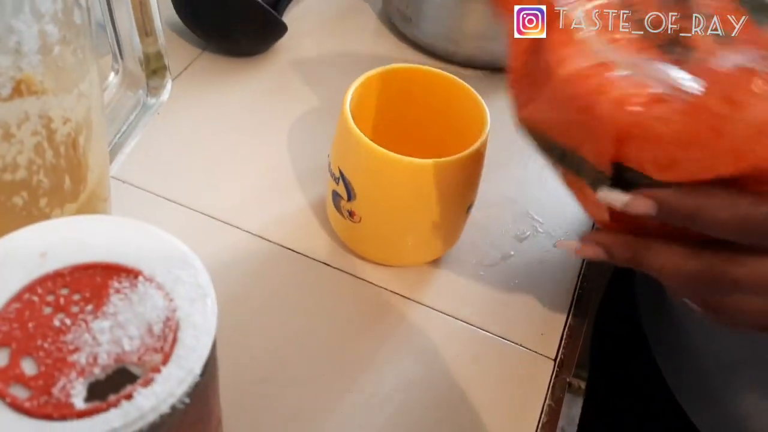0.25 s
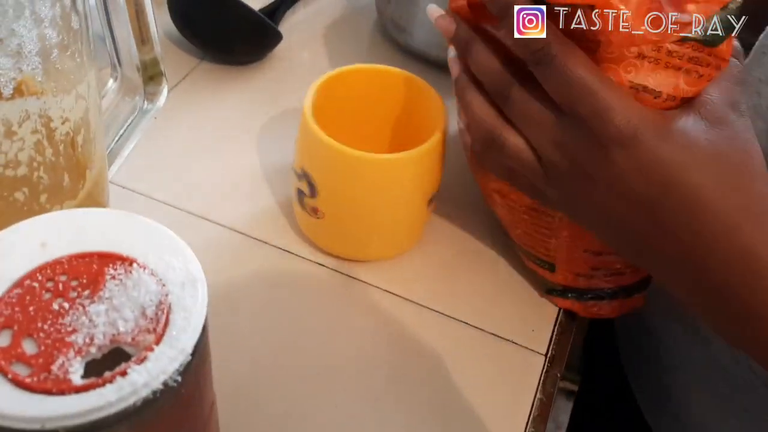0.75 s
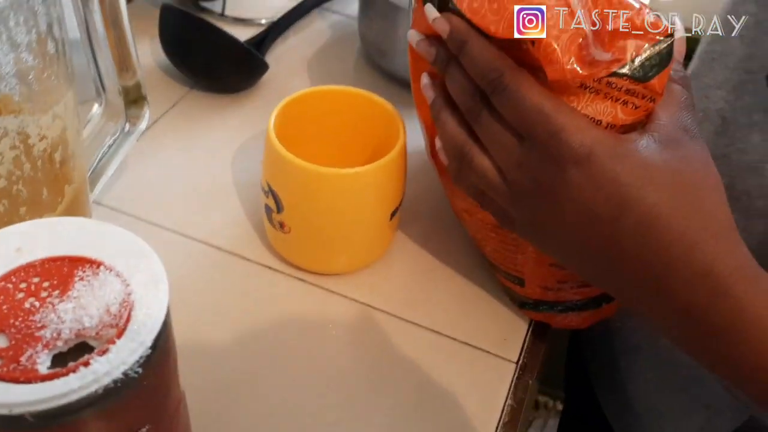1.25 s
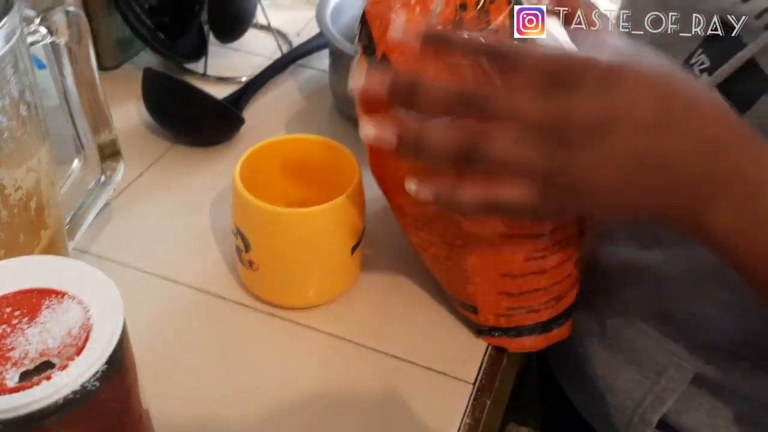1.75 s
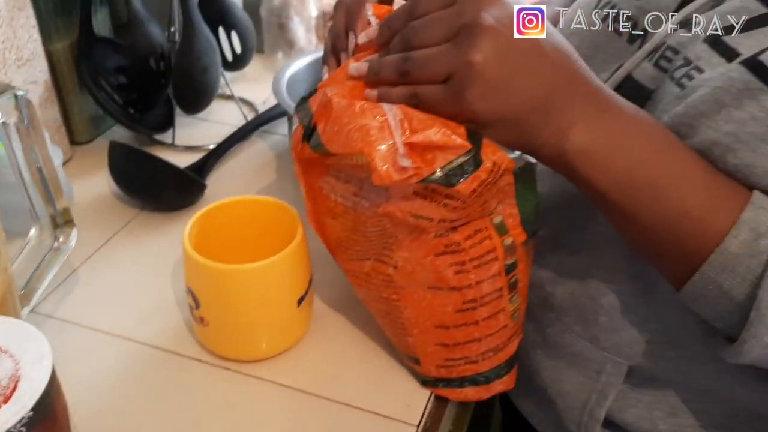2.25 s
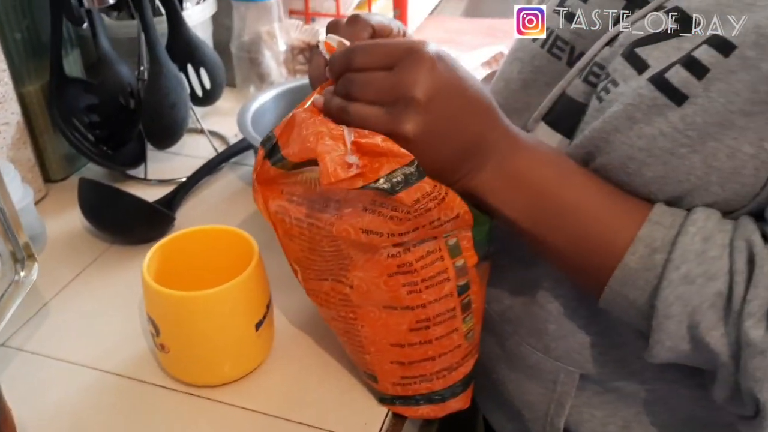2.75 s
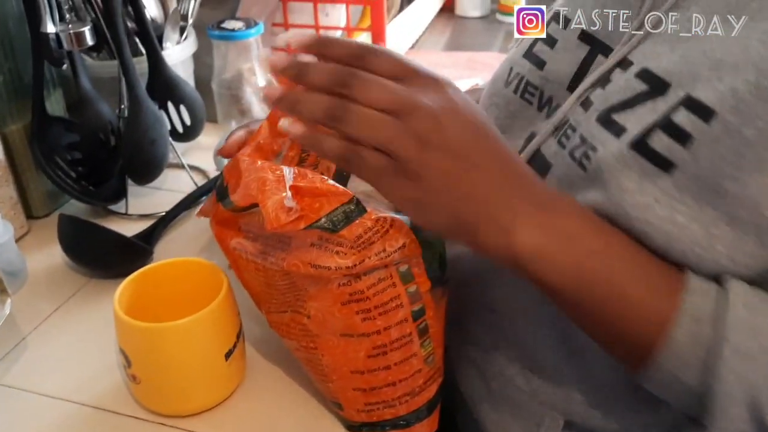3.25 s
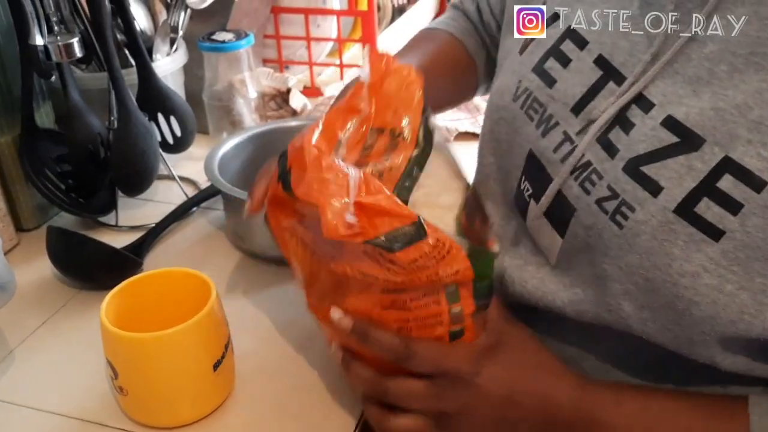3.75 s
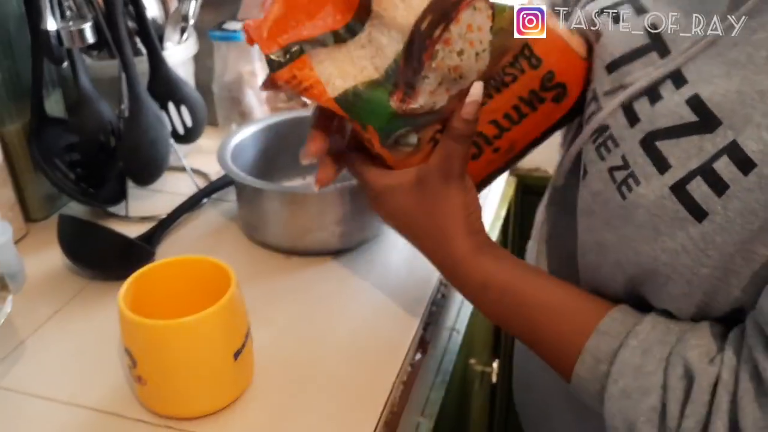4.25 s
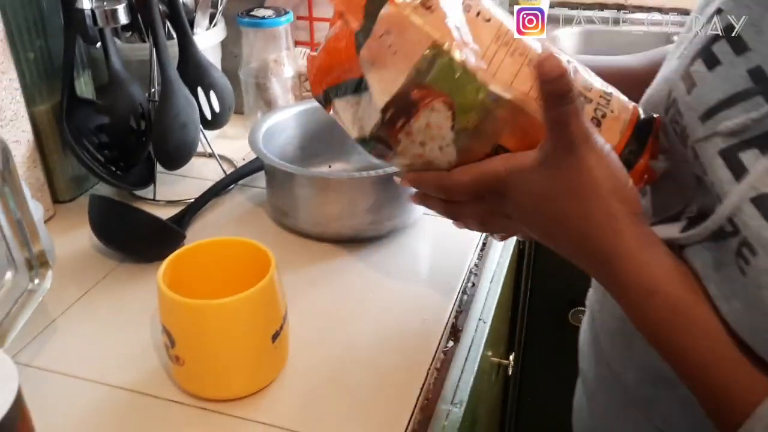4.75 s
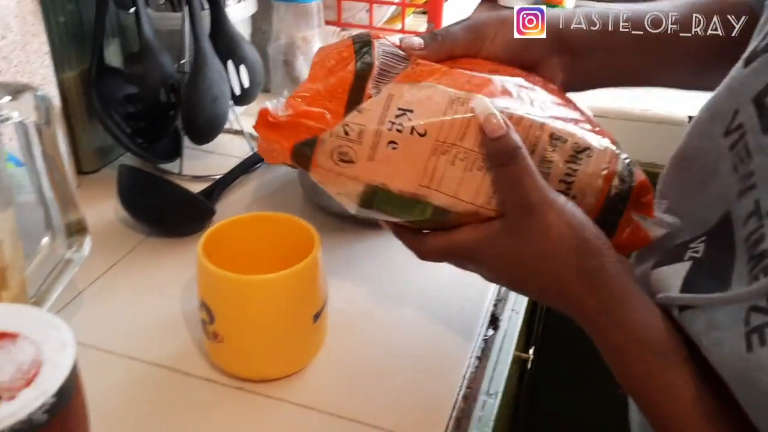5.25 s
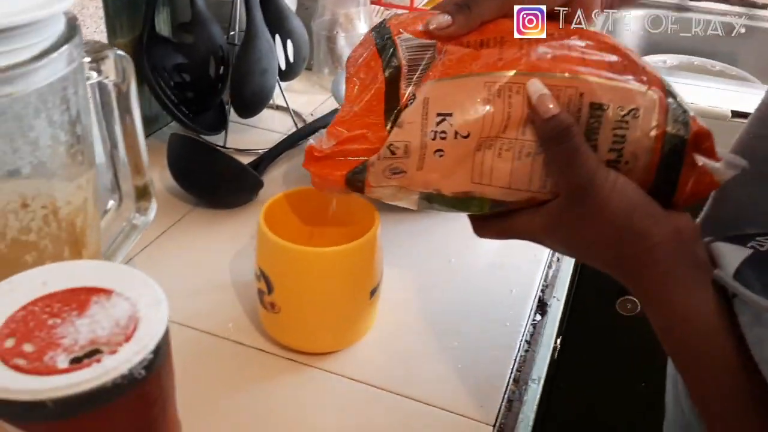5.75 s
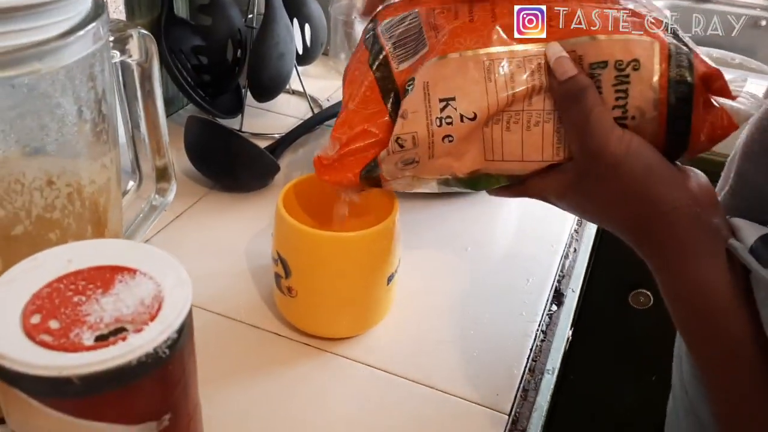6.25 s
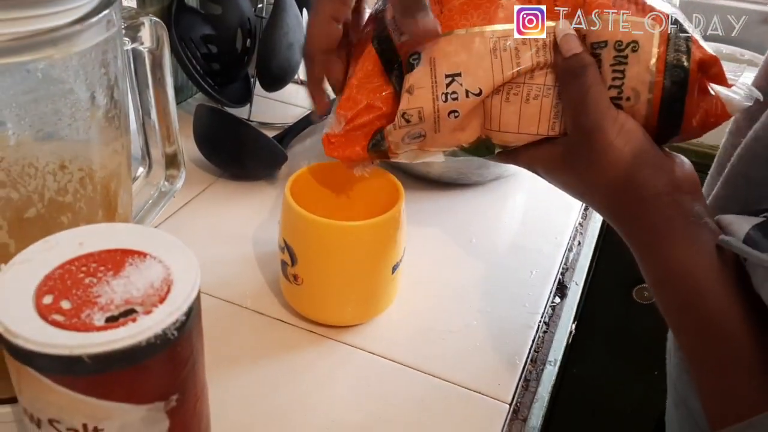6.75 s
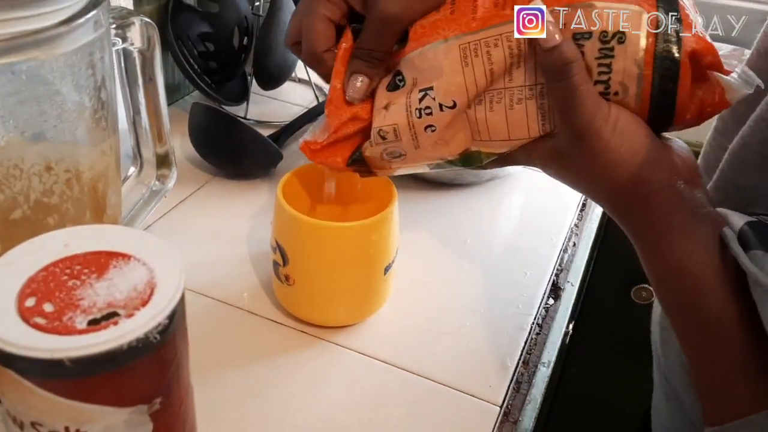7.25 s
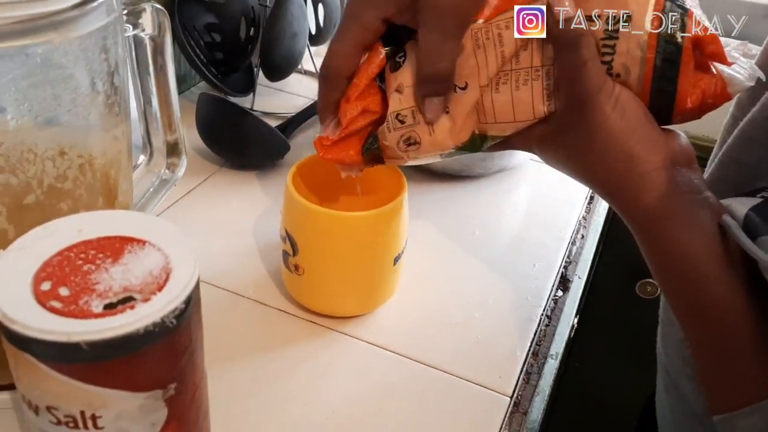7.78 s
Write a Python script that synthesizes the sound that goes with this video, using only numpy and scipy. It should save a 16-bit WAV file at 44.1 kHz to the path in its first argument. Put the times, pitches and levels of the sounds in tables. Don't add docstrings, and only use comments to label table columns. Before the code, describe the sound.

Close, wide stereo in a small, hard-surfaced kitchen: stiff film crinkles loudest at the start, with bright snaps, dull flops and low knocks from packed grain. A short stuttering rub on the counter and a few soft bumps follow. Handling becomes sparser, then crackles on as the bag tips and a light, high trickle of rice patters into a cup. Low rumble and faint hiss lie beneath.

```python
import sys
import numpy as np
from scipy import signal
from scipy.fft import rfft, irfft
from scipy.io import wavfile
from scipy.ndimage import uniform_filter1d

SR = 44100
rng = np.random.default_rng(int(sys.argv[2]) if len(sys.argv) > 2 else 0)


def gain_from_decibels(decibels):
    exponent = np.asarray(decibels, float) / 20
    return 10 ** exponent


def unload_wav(signal):
    wavfile.write(
        sys.argv[1],
        SR,
        np.round(np.clip(np.atleast_2d(signal).T, -1, 1) * 32767).astype(np.int16),
    )


N = 353682
T = np.arange(N) / SR


def evened(x):
    return x / np.sqrt(np.mean(x ** 2) + 1e-20)


def read(points, hz):
    f, value = np.transpose(points)
    return np.interp(np.log(hz + 1), np.log(f + 1), value)


def add(mix, s, sound):
    part = mix[..., round(s * SR):][..., :sound.shape[-1]]
    part += sound[..., :part.shape[-1]]


def colour(x, points):
    below, above = (points[0][0] / 2, -60), (points[-1][0] * 2, -60)
    curve = [below] + list(points) + [above]
    hz = np.fft.rfftfreq(x.shape[-1], 1 / SR)
    return irfft(rfft(x) * gain_from_decibels(read(curve, hz)), x.shape[-1])


def ring(x, modes):
    return sum(gain_from_decibels(db) * signal.lfilter(*signal.iirpeak(hz, hz / width, SR), x) for hz, width, db in modes)


def clicks(per_s, spread_db):
    size = gain_from_decibels(spread_db * np.minimum(rng.exponential(1, (2, N)), 4))
    happens = rng.random((2, N)) < per_s / SR
    return size * rng.choice([-1., 1.], (2, N)) * happens


def flicker(smooth_s):
    size = max(round(smooth_s * SR), 2)
    once = uniform_filter1d(rng.standard_normal(N), size)
    return evened(uniform_filter1d(once, size))


def apart(x, share):
    share = np.clip(share, 0, 1)
    return np.array([x[0], share * x[0] + np.sqrt(1 - share ** 2) * x[1]])


def swells(rows, rest_db):
    roundness = 1.14
    t, rows = T[::32], np.array(rows)
    peak_s, level_db, rise_s, fade_s = (rows[:, i:i + 1] for i in range(4))
    dt = t - peak_s
    away = np.where(dt < 0, -dt / abs(rise_s), dt / abs(fade_s))
    power = gain_from_decibels(2 * np.maximum(level_db - 10 * away ** roundness, -150))
    total = power.sum(0) + gain_from_decibels(2 * rest_db)
    blend = (power * rows[:, -1:]).sum(0) / total
    return np.interp(T, t, 10 * np.log10(total)), np.interp(T, t, blend)


# peak t/s, level/dB, rise/s, fade/s,
# brightness/dB
SQUEEZES = [(.005, -46, .03, 0.046, 3), (.1, -38.5, 0.043, 0.11, 4.5), (.37, -29, 0.077, 0.14, 4.5),
            (.7, -37.5, 0.23, 0.18, -0.5), (1.25, -39.5, 0.13, 0.086, -0.5),
            (1.56, -45.5, 0.033, 0.1, 3), (1.7, -40.5, 0.038, 0.086, -4.5),
            (1.85, -54, 0.08, 0.023, -6), (1.97, -48.5, 0.021, 0.16, 15),
            (2.1, -43, 0.14, 0.11, -0.5), (2.26, -40, 0.016, 0.032, 5.5),
            (2.47, -41.5, 0.03, 0.25, -3), (2.66, -44.5, 0.26, 0.17, -0.5),
            (3.07, -41, 0.067, 0.041, 4.5), (3.24, -42, 0.59, 0.042, 0),
            (3.46, -51.5, 0.39, 0.62, 1),
            (3.74, -44, .02, 0.052, 14), (3.76, -43, 0.2, 1, 0.5), (4.02, -45, 0.015, 0.92, -2),
                    (4.328, -66, 0.041, 0.77, 3), (4.479, -40, 0.077, 0.11, 2),
                    (4.69, -39, 0.15, 0.24, 3.5), (4.991, -41, 0.039, 0.19, -2),
                    (5.2, -36.5, 0.13, 0.11, 1), (5.78, -40.5, 0.23, 1, -0.5), (6.3, -56, 0.054, 0.26, 6),
                    (6.459, -37.5, 0.27, 0.069, 4.5), (6.87, -39.5, 0.027, 0.11, -5),
                    (6.99, -40.5, 0.049, 0.27, 0.5), (7.14, -63, 0.12, 0.17, 23),
                    (7.55, -40.5, 0.21, 0.084, 2), (7.85, -46, 0.097, 0.077, 5), (8.01, -43, 0.038, .1, -2)]
# middle t/s, level change/dB, half length/s
LULLS = [(2.213, -4, 0.028), (2.363, -7, 0.025), (2.805, -2.5, 0.027), (3.124, -5.5, 0.027),
         (6.014, -5.5, 0.09), (6.095, -10, 0.043), (6.698, -15.5, 0.1), (7.207, -6.5, 0.052),
         (7.319, -14, 0.024)]
# f/Hz, level/dB (per Hz)
WIDE_FOLDS = [(450, 4.5), (700, 8.5), (1400, 12.5), (2400, 13.5), (3300, 0), (4500, -9)]
# f/Hz, level/dB (per Hz)
FINE_CREASES = [(2400, -4), (3600, -5.5), (4600, -1), (6800, 0.5), (8500, -8)]
# f/Hz, level/dB (per Hz)
FIZZ = [(6500, -48), (8500, -7.5), (12500, 5.5), (16000, -5)]


def crinkle():
    level_db, bright_db = swells(SQUEEZES, -66)
    clumps = gain_from_decibels(1.11 * flicker(0.0057) + 2.7 * flicker(0.019))
    creases = apart(clicks(4000, 3.2), 0.12) * clumps
    panels_hz = np.geomspace(600, 3000, 9)
    panels = sum(ring(apart(clicks(25, 3.7), 0.07), [(hz, hz / 6.9, 0)]) for hz in panels_hz)
    folds = evened(colour(creases, WIDE_FOLDS)) + gain_from_decibels(-9.0) * evened(panels)
    fine = evened(colour(creases, FINE_CREASES)) * gain_from_decibels(bright_db - 3.0)
    fizz = evened(colour(creases, FIZZ)) * gain_from_decibels(1.05 * bright_db - 11.0)
    drift_db = 2.5
    film = sum(gain_from_decibels(drift_db * flicker(0.03)) * layer for layer in (folds, fine, fizz))
    t = T[::32]
    still_db = sum(db * np.exp(-((t - s) / half_s) ** 4) for s, db, half_s in LULLS)
    return gain_from_decibels(level_db + np.interp(T, t, still_db) + 0.62) * film


# t/s, level/dB, f/Hz, brightness/dB (from the peak)
CRACKS = [(0.098, -7.5, 1400, -18), (.173, -7.5, 4140, -15), (0.685, -3.5, 7000, -7),
          (1.178, -16.5, 1000, -12), (1.289, -14, 2000, -15), (1.509, -12, 4060, -3), (1.546, -17, 890, -5),
          (1.886, -12.5, 6600, -9.5), (1.956, -4, 2630, -10), (1.992, -12.5, 5700, -6),
          (2.149, -20.5, 1900, -12), (2.605, -11, 1150, -15), (3.737, -12, 5800, -3),
          (4.631, -17.5, 1180, -6), (4.735, -19, 5100, -8), (4.981, -10, 7200, -1.5),
          (5.243, -12, 1260, -16), (5.712, -10.5, 2030, -7), (6.276, -11.5, 1650, -20),
          (6.301, -7, 4350, -13), (6.366, -11, 1950, -1), (7.093, -6.5, 5340, -12.5),
          (7.107, -4.5, 6600, -2), (7.557, -10.5, 1070, -4), (7.81, -13, 7260, -1), (7.941, -7.5, 4500, 29),
          (7.958, -14, 620, 8), (7.983, -19, 2420, -8)]
# t/s, level/dB, f/Hz, knock in the bag/dB (from the peak)
JOLTS = [(0.024, -14.5, 1150, 9.5), (.319, -10.5, 5200, -13), (0.635, -22.5, 1120, 5),
         (0.74, -16.5, 830, -1), (.883, -12.5, 874, 6), (1.09, -22.5, 1230, 4), (1.239, -8, 1170, 5),
         (1.672, -13.5, 1390, 12), (2.018, -13.5, 1230, 3), (2.246, -19, 2240, -2), (2.59, -16.5, 2310, 6),
         (3.019, -22.5, 1160, 8), (3.175, -30, 1850, 20), (3.232, -16, 930, 5.5), (3.32, -25, 2340, 17.5),
         (3.588, -24.5, 1850, 1), (4.209, -29, 1200, 13.5), (4.457, -12, 2220, -25), (4.573, -28, 534, 27),
         (4.784, -17, 2100, 9.5), (4.85, -27, 725, -4), (5.313, -21.5, 2100, 12), (6.151, -24, 1110, 5),
         (6.177, -23.5, 2140, 9), (6.385, -11.5, 2270, 1), (6.994, -13.5, 905, -18), (7.436, -11, 735, -27),
         (7.858, -11.5, 2330, 8), (7.924, -12, 2180, 12)]
# t/s, level/dB, f/Hz
TICKS = [(.08, -18, 1450), (.269, -1.5, 1170), (1.115, -18.5, 1950), (1.551, -11, 2280), (1.797, -16, 2920),
         (2.448, -21, 1210), (1.201, -18.5, 690), (3.438, -20, 2600), (3.714, -11.5, 2000),
         (4.021, -16.5, 1140), (4.604, -19, 2320), (5.751, -14.5, 1020), (5.791, -12, 3050),
         (6.845, -10.5, 2240), (6.89, -16.5, 1230), (7.12, -28, 830), (7.247, -16.5, 796),
         (7.489, -18.5, 1930), (7.544, -22, 800), (7.853, -10.5, 2270), (7.9461, -2.5, 2260),
         (4.692, -12, 2980)]
# t/s, level/dB, f/Hz
FLOPS = [(1.633, -22, 1470), (1.645, -20.5, 2360), (2.282, -18, 2830), (2.488, -15, 1710),
         (2.517, -20.5, 2200), (2.747, -21.5, 2850), (2.948, -28.5, 1580), (3.075, -22, 2840),
         (3.364, -20.5, 1160), (3.686, -20, 814), (4.082, -27, 1590), (4.351, -22.5, 1640),
         (5.199, -23, 720), (5.697, -14, 1140), (6.239, -18, 1750), (7.045, -16, 2260)]
# t/s, level/dB, f/Hz
PINGS = [
    (7.782, -12.5, 1737),
]
# t/s, level/dB, f/Hz, brightness/dB (from the peak)
SNICKS = [(1.85, -30, 2630, -25), (1.898, -23, 5990, -16), (2.396, -26, 1220, -17), (2.667, -23, 1020, -15),
          (2.84, -27.5, 2590, -21), (2.85, -26, 1060, -29), (2.896, -35, 1560, -22),
          (2.929, -28, 1580, -26), (2.999, -31, 1100, -18), (3.265, -31, 1620, -26),
          (3.653, -38, 2040, -18), (3.908, -21.5, 2700, -22), (4.136, -32, 2040, -20),
          (4.389, -27, 1880, -16), (4.914, -37.5, 2070, -20), (5.129, -35, 1680, -14),
          (5.394, -27.5, 1270, -24), (5.473, -30, 7810, -11), (5.539, -40, 2150, -18),
          (5.629, -26, 2140, -14), (6.039, -31, 7790, -16), (6.42, -11, 1142, -14), (7.263, -20, 1240, -19),
          (7.287, -21, 6200, -22), (7.343, -30, 1230, -18), (7.394, -29, 2050, -16),
          (7.452, -14.5, 853, -10), (7.674, -24, 2120, -25), (7.992, -19, 2050, -22),
          (8.001, -15.5, 2410, -21)]


def creases_popped():
    ping_db, clear_ping_db = -9, 1
    tick_knock_db, tick_bright_db = -25, -17.5
    pops = [(s, db, hz, -54, bright_db, ping_db) for s, db, hz, bright_db in CRACKS]
    pops += [(s, db, hz, knock_db, 8.5 + 2.53 * db, ping_db) for s, db, hz, knock_db in JOLTS]
    pops += [(s, db, hz, tick_knock_db, tick_bright_db, ping_db) for s, db, hz in TICKS]
    pops += [(s, db, hz, -42, -31.5, ping_db) for s, db, hz in FLOPS]
    pops += [(s, db, hz, tick_knock_db, tick_bright_db, clear_ping_db) for s, db, hz in PINGS]
    pops += [(s, db - 3, hz, -26, bright_db, ping_db) for s, db, hz, bright_db in SNICKS]
    return pops


# f/Hz, width/Hz, level/dB
BAG = [(168, 29, 0), (250, 190, -23), (329.4, 39.4, 7.5), (360, 204, -5.5), (486, 300, -4)]


def snaps():
    pops, t = creases_popped(), np.arange(1024) / SR
    out, knocks = np.zeros((2, N)), np.zeros(N)
    noise = rng.standard_normal((len(pops), 2, 2, 1024))
    chance = (np.arange(len(pops))[:, None] * [0.618, 0.415]) % 1
    rise = np.minimum(t / 0.00014, 1)
    for pop_row, (burst, rustle), (lag, tear) in zip(pops, noise, chance):
        s, db, hz, knock_db, bright_db, ping_db = pop_row
        tone = [(400, -3.5), (1200, -1.0), (3500, 0.34 * bright_db + 4.0),
                (9000, bright_db + 8.0), (16500, bright_db - 0.5)]
        tear_s = 0.0004 + 0.0012 * tear
        ticks = apart(burst * abs(burst) ** 0.84 * rise * np.exp(-t / tear_s), 0.76)
        spike = 3.5 * gain_from_decibels(0.7 * (db + 14)) * (np.arange(1024) == 6)
        after = 0.77 * rustle * rise * np.exp(-t / 0.0055)
        crack = colour(ticks + spike + after, tone)
        ping_fade = np.exp(-np.pi * hz / 8.3 * gain_from_decibels(-ping_db - 10) * t)
        ping = rise * ping_fade * np.sin(2 * np.pi * hz * t)
        pop = np.roll(crack / abs(crack.mean(0)).max() + gain_from_decibels(ping_db) * ping, 44, axis=1)
        pop[1] = np.roll(pop[1], round(2 + 8 * lag))
        add(out, s - 0.0002, gain_from_decibels(db - 2.0) * pop / abs(pop.mean(0)).max())
        add(knocks, s + 0.00196, gain_from_decibels(db + knock_db + 11.0) * np.hanning(24) / 12)
    return out + ring(knocks, BAG + [(690, 47, 0.47)])


# peak t/s, level/dB, rise/s, fade/s
SLUMPS = [(.05, -43.5, 0.025, 0.22), (.29, -30.5, 0.022, 0.096), (.78, -33.5, 0.13, 0.093),
          (.89, -29.5, .02, 0.023), (1.3, -32.5, 0.15, 0.045), (1.67, -38.5, 0.18, 0.12),
          (2.14, -40, 0.15, 0.043), (2.26, -38, 0.035, 0.085), (2.5, -35, 0.057, 0.065),
          (2.6, -27.5, 0.013, 0.06), (2.77, -33, 0.065, 0.049), (2.93, -37.5, 0.032, 0.038),
          (3.02, -34, 0.015, 0.093), (3.73, -37.5, 0.099, 0.058), (3.93, -38, 0.056, 0.024),
          (4.0, -39.5, 0.023, 0.068), (4.36, -38.5, 0.011, 1), (4.84, -38, 0.34, 0.024),
          (5.01, -52, 0.026, 0.58), (5.83, -32.5, 0.11, 0.051), (6.01, -38, 0.062, 0.071),
          (6.36, -34, 0.18, 0.2), (6.88, -31, 0.031, 0.025), (7.06, -37.5, 0.23, 0.099),
          (7.28, -38.5, 0.022, 0.01), (7.46, -38.5, 0.1, 0.047), (7.57, -28.5, 0.056, 0.019),
          (7.86, -39, 0.026, 0.017), (7.93, -28.5, 0.0039, 0.063)]


def grain_mass():
    slumps = gain_from_decibels(2.5 * flicker(0.008))
    thuds = apart(clicks(350, 3.45), 0.97) * slumps
    soft = signal.lfilter(*signal.butter(2, 750, fs=SR), thuds)
    return gain_from_decibels(swells(SLUMPS, -57)[0] - 0.5) * evened(ring(soft, BAG))


# t/s, level/dB, f/Hz
THUMPS = [
    (1.243, -15, 135),
    (1.271, -20.5, 299),
    (1.297, -22, 351),
    (1.552, -29, 268),
    (2.584, -38, 316),
    (3.029, -35, 153),
    (5.201, -25.5, 162),
    (6.276, -24.5, 151),
]


def thumps():
    out, t = np.zeros(N), np.arange(SR // 8) / SR
    fade_s_per_khz = 0.058
    for s, db, hz in THUMPS:
        push = np.minimum(t / 0.0037, 1)
        fade = np.exp(-t / (fade_s_per_khz * hz / 1000))
        add(out, s, gain_from_decibels(db) * push * fade * np.sin(2 * np.pi * hz * t))
    return out


# t/s, level/dB
POUR = [
    (5.72, -52),
    (5.88, -52.5),
    (6.61, -65),
    (6.84, -63),
    (6.91, -62),
    (7.05, -47.5),
    (7.41, -61),
    (7.81, -64),
    (8.0, -57),
]
# t/s, level/dB
SPURTS = [(5.8002, -25), (5.874, -36), (5.9718, -33), (5.9994, -31), (6.0394, -36), (6.0916, -30),
          (6.1823, -24.5), (6.6074, -31), (6.6463, -42), (6.665, -38), (6.6864, -45.5), (6.7226, -50.5),
          (6.7476, -39), (6.8024, -42), (6.9301, -32), (7.1616, -31), (7.1816, -36), (7.1994, -32),
          (7.2894, -42), (7.3894, -38), (7.4894, -31), (7.7468, -36)]
# f/Hz, width/Hz, level/dB
CUP = [(4870, 300, 6.5), (5740, 380, 7.5), (6770, 140, 8), (7930, 250, 9.5), (10900, 210, 5),
       (11400, 200, -3), (11950, 200, 4), (13900, 300, 4), (15500, 300, -2)]


def rice():
    pour_s, pour_db = np.transpose(POUR)
    level_db = np.interp(T, pour_s, pour_db)
    on = np.interp(T, [POUR[0][0], POUR[0][0] + 0.073], [0, 1])
    spurt_rows = [(s, db - 6.5, 0.0015, 0.011) for s, db in SPURTS]
    spurts_db = swells(spurt_rows, -90)[0]
    flow = np.hypot(gain_from_decibels(level_db + 11) * on, gain_from_decibels(spurts_db))
    ticks = apart(clicks(2200, 4), 0.15) * gain_from_decibels(2 * flicker(0.006))
    bare = colour(ticks, [(4500, -14), (8000, 17), (16000, 9.0)])
    wander_db = 3
    wall = sum(gain_from_decibels(wander_db * flicker(0.0099)) * ring(ticks, [mode]) for mode in CUP)
    no_lows = signal.butter(4, 4300, "high", fs=SR, output="sos")
    return flow * evened(signal.sosfilt(no_lows, wall + 0.18 * bare))


# peak t/s, level/dB, rise/s, fade/s
DRAG_JERKS = [
    (.744, -23, 0.0045, 0.036),
    (.773, -27.5, 0.0056, .012),
    (.79, -26, 0.0068, 0.015),
    (.808, -25.5, 0.01, 0.017),
    (.833, -23.5, .014, 0.0068),
    (.862, -32, 0.011, 0.0083),
]
# f/Hz, width/Hz, level/dB
COUNTER = [(246, 19, 1), (480, 17, 0), (838, 66, 2), (1230, 12, 0.5)]


def drag():
    slips = clicks(1444, 1.2)[0] * gain_from_decibels(1.3 * flicker(0.0057))
    squeak_hz = 851 * (1 + 0.055 * flicker(0.00586))
    squeak = np.sin(2 * np.pi * np.cumsum(squeak_hz) / SR)
    squeak_db = -1 + 2 * flicker(0.0017)
    rub = evened(ring(slips, COUNTER)) + gain_from_decibels(squeak_db) * squeak
    return gain_from_decibels(swells(DRAG_JERKS, -120)[0]) * evened(rub)


# f/Hz, likeness (1 = same)
SAME = [(60, 0.98), (250, 0.92), (700, 0.23), (2000, 0.016), (16000, 0.037)]
# f/Hz, time to fall 60 dB/s
ECHO_TIMES = [(200, 0.26), (700, 0.31), (2000, .22), (6000, 0.23), (14000, 0.17)]


def kitchen(x):
    taps = np.zeros((2, SR // 2))
    at = np.arange(120, SR // 2 - 20, 20)
    at = at + rng.integers(0, 20, (2, len(at)))
    np.put_along_axis(taps, at, rng.choice([-1., 1.], at.shape), 1)
    hz, t, z = signal.stft(taps, SR, nperseg=256)
    z = apart(z, read(SAME, hz)[:, None])
    fade = gain_from_decibels(-60 * t / read(ECHO_TIMES, hz)[:, None])
    tail = signal.istft(z * fade, SR, nperseg=256)[1]
    return signal.fftconvolve(x, tail / np.linalg.norm(tail[0]), axes=1)[:, :N]


# f/Hz, level/dB (per Hz)
HUM = [(30, -64), (48, -13.5), (65, -6), (92, -2.5), (130, -9), (200, -15.5), (330, 9), (600, 10),
       (1200, -30), (2300, -68), (4000, -10), (8000, -13), (16000, -18)]
# peak t/s, level/dB
RUMBLE_SWELLS = [
    (.15, -39.5),
    (3.88, -57),
    (5.83, -36),
    (6.92, -42),
    (7.55, -44),
    (7.98, -38),
]


def air():
    frames, hz = N // 256 + 5, np.fft.rfftfreq(1024, 1 / SR)
    a, b, c, d, patches = rng.standard_normal((frames, 513, 5)).T
    patches = evened(uniform_filter1d(uniform_filter1d(patches, 10, 0), 12, 1))
    z = apart([a + 1j * b, c + 1j * d], read(SAME, hz)[:, None]) * gain_from_decibels(1.6 * patches)
    noise = colour(signal.istft(z, nperseg=1024, noverlap=768)[1][:, :N], HUM)
    rumble = signal.sosfilt(signal.butter(4, 150, fs=SR, output="sos"), noise)
    hiss = signal.sosfilt(signal.butter(4, 150, "high", fs=SR, output="sos"), noise)
    rumble_rows = [(s, db, 0.057, 0.23) for s, db in RUMBLE_SWELLS]
    rumble_db = swells(rumble_rows, -48.5)[0]
    return gain_from_decibels(rumble_db) * evened(rumble) + gain_from_decibels(-56) * evened(hiss)


def scene():
    pops = snaps()
    near = crinkle() + grain_mass() + thumps() + rice() + drag()
    echoes = kitchen(gain_from_decibels(-6.5) * pops + gain_from_decibels(-8.5) * near)
    return pops + near + echoes + air()


def low_pass(x):
    return signal.sosfilt(signal.butter(12, 16970, fs=SR, output="sos"), x)


# f/Hz, left minus right level/dB
SIDES = [(60, 0.5), (150, 3), (380, 0), (950, 2.5), (2380, 2.5), (5980, -3), (15000, 3)]


def record(dry):
    lean_db = read(SIDES, np.fft.rfftfreq(N, 1 / SR)) / 2
    heard = irfft(rfft(dry) * gain_from_decibels(np.array([lean_db, -lean_db])), N)
    heard = 0.8 * np.tanh(heard / 0.8)
    treble_cut = signal.firwin(511, 15750, window=("kaiser", 6), fs=SR)
    mix = signal.oaconvolve(heard, treble_cut[None], "same")
    return low_pass(mix)


dry = scene()
out = record(dry)
unload_wav(out)
```